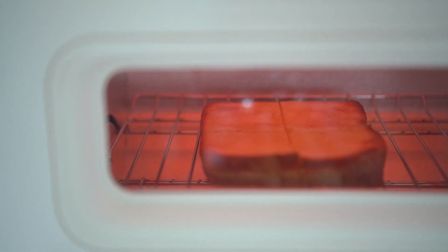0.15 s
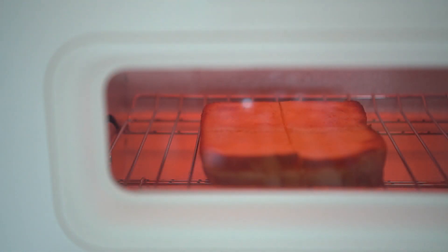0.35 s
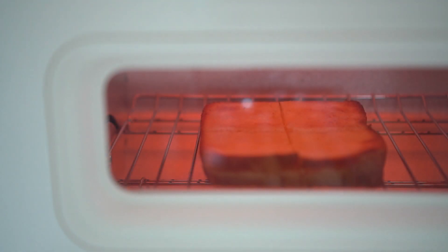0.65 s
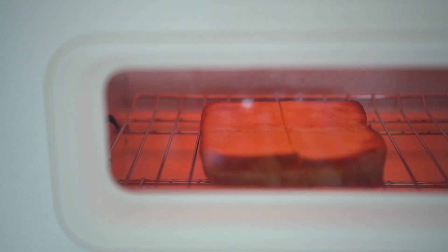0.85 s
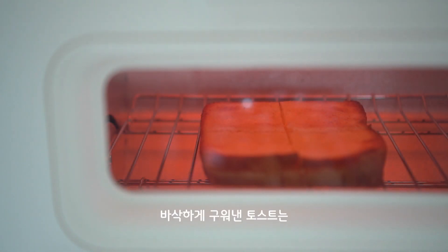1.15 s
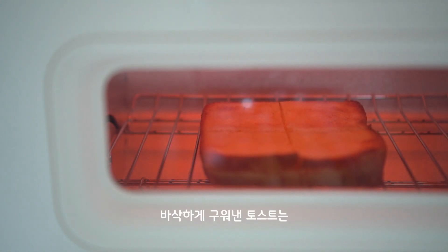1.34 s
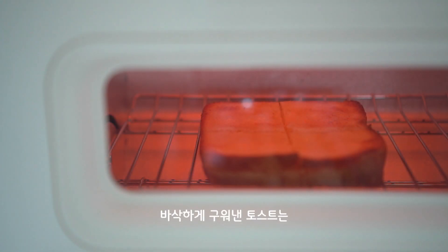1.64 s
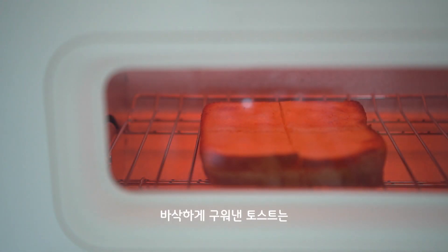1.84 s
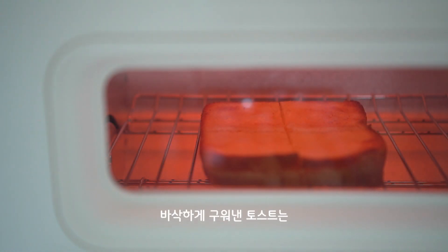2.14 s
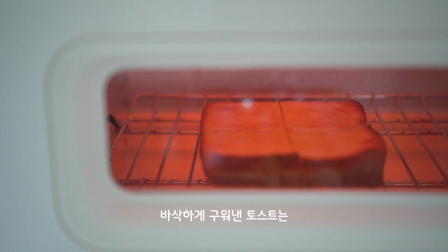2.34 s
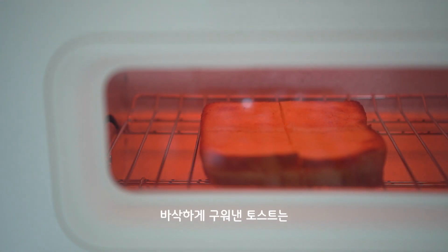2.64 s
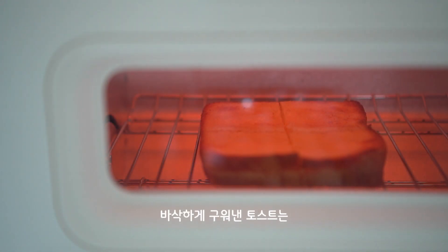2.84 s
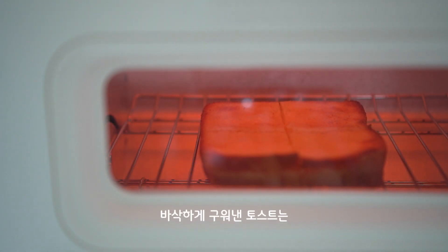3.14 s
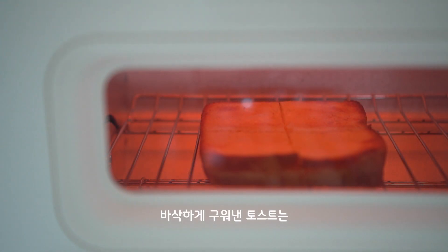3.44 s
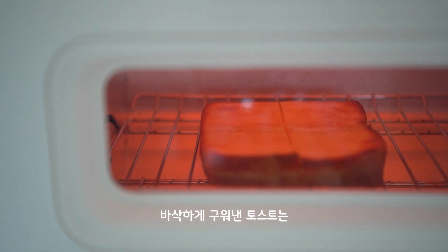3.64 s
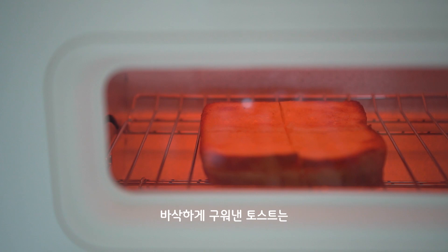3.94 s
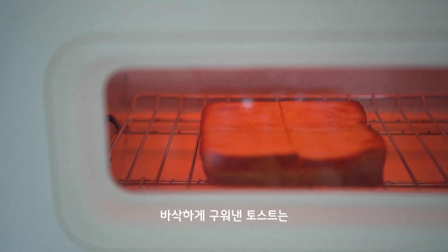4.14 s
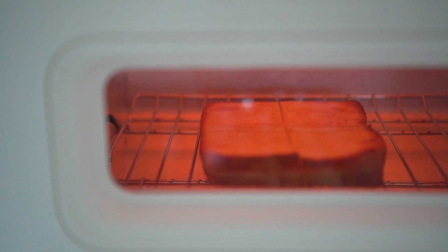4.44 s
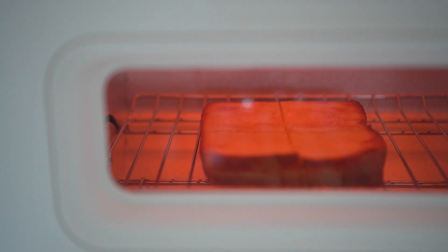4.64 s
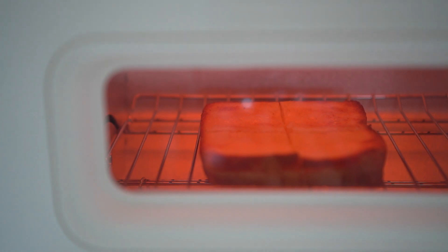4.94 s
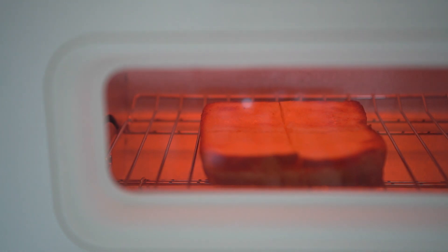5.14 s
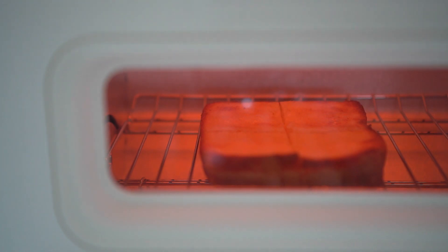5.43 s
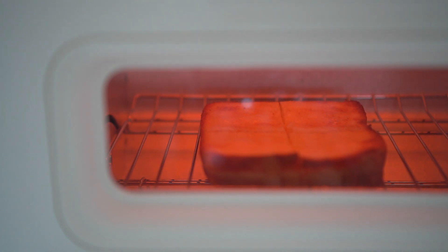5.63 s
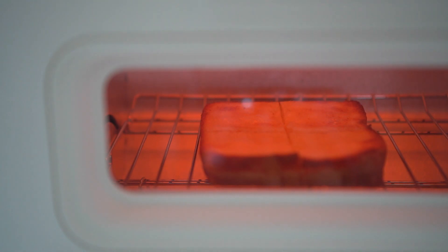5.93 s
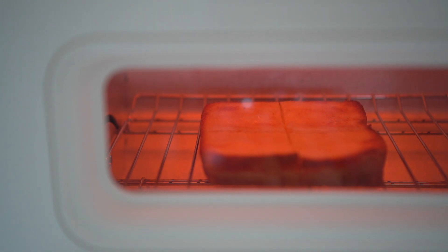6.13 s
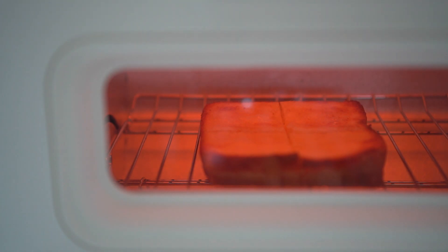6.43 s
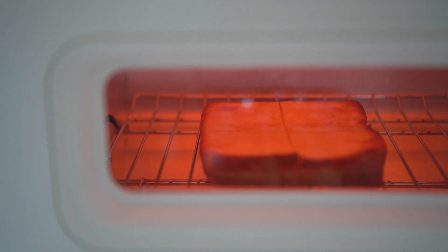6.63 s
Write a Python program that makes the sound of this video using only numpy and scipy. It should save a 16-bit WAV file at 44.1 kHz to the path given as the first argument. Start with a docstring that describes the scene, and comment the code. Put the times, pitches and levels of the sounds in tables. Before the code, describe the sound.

Steady, bright mechanical ticking over faint hum and hiss, a sharp rack click, then a duller sheet-metal clack, amid soft woody knocks.

```python
"""A toaster oven bakes bread in a quiet kitchen, over a faint hum, the air of the room and microphone hiss.
Its clockwork timer soon starts to tick twice a second, a little to the right: small ringing plates.
Near 2 s come three soft knocks, woody tones with a thud. Hot metal then lets go: the rack clicks brightly
at 2.9 s and, after one more knock, the sheet wall clacks more dully at 3.8 s, both as noise and ringing tones.
Two more knocks follow, the last near 6 s, then a faint, soft bump of noise."""
import sys
import numpy as np
from scipy import signal
from scipy.fft import rfft, irfft, next_fast_len
from scipy.io import wavfile
from scipy.ndimage import map_coordinates

SR = 44100
rng = np.random.default_rng(int(sys.argv[2]) if len(sys.argv) > 2 else 0)


def bounce(signal):
    """Save signal as a 16-bit WAV file at the path given by the first command-line argument."""
    frames = np.transpose(np.atleast_2d(signal))
    limited = np.clip(frames, -1, 1)
    pcm = np.round(limited * 32767).astype(np.int16)
    wavfile.write(sys.argv[1], SR, pcm)


N = 298998
RING = np.arange(SR // 2) / SR  # half a second of time after a blow [s]

# Levels in the tables are relative. Decay is the time to fall by 60 dB.
# Left-right is the left level minus the right; side-middle sets how wide the stereo is.

# ringing plates of the timer: (frequency [Hz], level [dB], decay [s], left-right [dB])
TIMER_PLATES = [(3870, 0.5, 0.012, -16.5), (4024, 1, 0.015, 1), (4517, 1.5, 0.012, -15),
                (4894, -1.5, 0.012, -9), (5240, -8, 0.015, 1), (5500, -16.5, 0.017, -14),
                (11100, -34, .025, 2)]
# noise of the timer's parts touching: (frequency [Hz], level [dB])
TIMER_CONTACT = [(2000, -30), (5500, -5), (7200, -10), (8200, 2), (9600, -8), (10900, 1.5), (12000, -12),
                 (16000, -26)]
# the tick as the kitchen returns it: (frequency [Hz], level [dB])
TICK_WASH = [(2500, -34), (3500, -26), (3850, 0), (4050, -1.5), (4250, -7), (4550, -2.5), (4850, -3),
             (5300, -18), (6200, -21.5), (12000, -45)]
# main tones of the wire rack: (frequency [Hz], level [dB], decay [s])
RACK_TONES = [(593, -14.5, 0.15), (830, -23, 0.32), (877, -19.5, 0.33), (1804, -9.5, 0.12),
              (2310, -25, .22), (2430, -20, .14), (2540, -22, 0.15), (2556, 2, 0.1), (2650, -26, 0.26),
              (3300, -19, 0.18), (3770, 1, 0.074), (4700, -16, .04), (6300, -5, 0.079), (9340, -9, 0.072),
              (13370, -12, .035)]
# the rack's crowd of short-lived tones, as noise: (frequency [Hz], level [dB])
RACK_CRASH = [(180, -56), (300, -24), (885, -12), (1170, -22), (1780, -9), (2030, -13), (2570, 2),
              (2930, -16), (3830, -12), (4990, -12), (6200, -10.5), (9710, -18), (11300, -15), (13800, -10),
              (16000, -29)]
# main tones of the sheet wall: (frequency [Hz], level [dB], decay [s])
WALL_TONES = [(148, -22.5, 0.28), (209, -12, 0.35), (606, -15, 0.33), (643, -14, 0.43), (761, 1, 0.31),
              (1044, -12, 0.19), (1225, 1.5, 0.13), (1407, -14, .19), (1796, -10.5, 0.36), (2302, -12, .18),
              (2403, -3, .16), (2590, -15, .16)]
# the wall's crowd of short-lived tones, as noise: (frequency [Hz], level [dB])
WALL_CRASH = [(59, -54), (100, -38), (189, -22), (535, -16), (752, -4), (970, -10.5), (1250, -5),
              (2000, -13), (2370, -7), (2690, -11.5), (4110, -11.5), (5770, -18), (16000, -28)]
# the kitchen hanging on after each loud snap: (frequency [Hz], level [dB])
LINGER = [(100, -14), (200, 4), (380, 6), (750, -2), (1300, 1), (2500, -9), (5000, -24), (12000, -45)]
# how fast echoes die in the kitchen: (frequency [Hz], decay [s])
KITCHEN_DECAY = [(200, 0.86), (1000, 0.44), (4500, 0.24), (9000, 0.19), (15000, .13)]
# soft knocks: (time [s], level [dB], pitch ratio [1], change of the thud's treble [dB])
KNOCKS = [(2.0144, -36.5, 1.06, -14), (2.0859, -36.5, 1.06, -3), (2.1130, -44, 1.094, -12),
          (3.1915, -33.5, 0.97, -12), (4.448, -31.5, 0.995, 4.5), (5.9720, -29, 0.993, 5.5)]
# tones of the counter: (frequency [Hz], level [dB], decay [s])
COUNTER_TONES = [(306, -15, 0.073), (630, -7.5, 0.043), (739, -8, 0.065), (883, -9, 0.028),
                 (1052, -12, 0.062), (1290, -27, 0.074)]
# thud under each knock: (frequency [Hz], level [dB])
THUD = [(120, -35), (280, -2), (700, 8.5), (1100, 2), (1700, -4), (2400, 1), (3000, -14), (5000, -38)]
# faint bump: (frequency [Hz], level [dB])
BUMP = [(30, -22), (70, -4), (110, 6), (170, -14), (350, -3), (700, 8), (1200, -25), (3000, -60)]
# air of the room: (frequency [Hz], level [dB])
AIR = [(25, -52), (50, -60), (70, -44), (90, -25.5), (110, -17.5), (140, -12.5), (175, -13), (215, -7),
       (285, -4), (450, -5.5), (800, -7.5), (1130, -1), (1450, -4.5), (1900, -13.5), (2600, -45),
       (4400, -120)]
# hollow resonances of the air: (frequency [Hz], width [Hz], level [dB])
CAVITIES = [(1124, 41, 5), (1140, 49, -7), (943, 165, -1), (2936, 104, -3)]
# appliance hum, before it wavers: (frequency [Hz], level [dB])
HUM = [(120, -82.5), (279, -72.5), (371, -67.5), (511, -73.5), (657, -69.5), (1125, -66.5)]
# microphone hiss: (frequency [Hz], level [dB])
HISS = [(1180, -27.5), (2000, -4.5), (2640, -2.5), (3010, -2), (3710, -6), (5160, -7.5), (5680, -8),
        (7120, -9.5), (14800, -13.5), (16000, -15)]
# stereo width of the room's sounds: (frequency [Hz], side-middle [dB])
WIDTH = [(60, -30), (130, -14), (280, -9.5), (450, -4.5), (700, 0.5), (1150, -4.5), (1550, 0), (2300, 1.5),
         (2950, -1.5), (3600, -0.5), (8000, -2), (15000, -2)]
# lean of the background to one side: (frequency [Hz], left-right [dB])
LEAN = [(60, -3), (110, 1), (200, 0.5), (380, 1), (700, 0.5), (1290, 3.5), (2380, -1.5), (4400, -2.0),
        (8120, -2.0), (15000, -2.0)]

FIRST_BEAT_S, BEAT_S = 0.4488, 0.5  # time of the first beat, time between beats
TICK_DB, TICK_SCATTER_DB = -28.5, 0.7  # gain of a beat, its random spread
SNAP_DB = -28.5  # gain of each snap of hot metal
LINGER_DB, LINGER_RISE_S, LINGER_T60_S = -24.5, 0.036, 1.2  # gain within the snap, build-up, decay
AIR_DB, HISS_DB = -55.5, -58
TOP_HZ = 15900


def amp(db):
    """Turn decibels into a gain."""
    return 10 ** (np.asarray(db) / 20)


def unit(x):
    """Scale a sound to an average strength (rms) of 1."""
    return x / np.sqrt(np.mean(x ** 2) + 1e-20)


def along(points, hz):
    """Read a curve of (frequency, value) points, spaced as the ear hears pitch."""
    f, v = np.transpose(points)
    return np.interp(np.log(hz + 1), np.log(f + 1), v)


def pan(lean_db):
    """Left and right gains for a level difference; positive leans left."""
    return amp(np.array([[.5], [-.5]]) * lean_db)


def wobble(rate):
    """A smooth random curve through a given number of random points a second."""
    points = rng.standard_normal(int(N * rate / SR) + 4)
    return map_coordinates(points, [np.arange(N) * rate / SR])


def filtered(x, response):
    """Multiply each frequency of a sound by a response."""
    n = x.shape[-1]
    m = next_fast_len(n + SR // 4)
    spectrum = rfft(x, m) * response(np.fft.rfftfreq(m, 1 / SR))
    return irfft(spectrum, m)[..., :n]


def noise(spectrum, width, size):
    """Coloured stereo noise whose middle has rms 1."""
    white = rng.standard_normal((2, size))
    mid, side = filtered(white, lambda hz: amp(along(spectrum, hz)))
    side = filtered(side, lambda hz: amp(along(width, hz)))
    return np.array([mid + side, mid - side]) / np.std(mid)


def fade(attack, t60):
    """Loudness shape of a blow: a short rise, then a steady fall of 60 dB in t60 seconds."""
    rise = 1 - np.exp(-(RING / attack) ** 2)
    return rise * amp(-60 * RING / t60)


def add(track, s, sound):
    """Mix a sound into the track at time s."""
    i = round(s * SR)
    track[:, i:i + sound.shape[-1]] += sound[..., :N - i]


def scatter(decay, delay):
    """A stereo cloud of reflections in which each frequency dies at its own speed."""
    hz, t, z = signal.stft(rng.standard_normal((2, len(RING))), SR, nperseg=256)
    z[1] *= np.minimum(hz / 900, 1)[:, None]  # long waves reach both microphones alike
    dying = z * amp(-60 * t / along(decay, hz)[:, None])
    mid, side = signal.istft(dying, SR, nperseg=256)[1][:, :len(RING)]
    # silent until the delay, full after twice the delay
    return np.array([mid + side, mid - side]) * np.clip(RING / delay - 1, 0, 1)


def echo(sound, cloud, db):
    """The reflections of a sound, at a level in dB against the sound itself."""
    wet = signal.fftconvolve(sound.mean(0)[None], cloud, axes=1)[:, :len(RING)]
    return amp(db) * np.std(sound) * wet / np.std(wet, axis=1, keepdims=True)


def timer(contact_db=-22, casing_db=-8.0, wash_db=-22, wash_t60=0.24, lag=0.000257):
    """Even beats ring the same small plates; the casing answers early, the kitchen in a soft wash."""
    out = np.zeros((2, N))
    casing = scatter([(4000, 0.019)], delay=0.003)
    walls = noise(TICK_WASH, [(4000, 0)], len(RING))  # the same paths at every beat
    for s in np.arange(FIRST_BEAT_S, N / SR, BEAT_S):
        contact = noise(TIMER_CONTACT, [(8000, 1)], len(RING)) * fade(attack=0.0005, t60=0.026)
        tick = amp(contact_db) * contact * pan(-1.5)
        for hz, mode_db, t60, lean_db in TIMER_PLATES:
            # the plates line up 0.8 ms into the blow, then drift apart and beat
            pitch = hz * (1 + rng.normal(0, .002))
            swing = np.cos(2 * np.pi * pitch * (RING - .0008))
            gain = amp(mode_db + rng.normal(0, .8))
            tick += gain * pan(lean_db) * swing * fade(attack=.0012, t60=t60)
        tick[0] = np.interp(RING - lag, RING, tick[0], left=0)  # the left microphone is farther away
        near = echo(tick, casing, casing_db) * pan(-3)
        # nearby walls answer first, the whole room lingers
        lingering = fade(.006, wash_t60) + amp(-12.5) * fade(0.01, 0.81)
        fresh = noise(TICK_WASH, [(4000, 0)], len(RING))
        wash = amp(wash_db) * (.8 * walls + .6 * fresh) * lingering * pan(-2)
        force = amp(TICK_DB + TICK_SCATTER_DB * rng.standard_normal())
        add(out, s, force * (tick + near + wash))
    return out


def hot_metal():
    """The hot rack clicks in its rails; a second later the sheet wall pops."""
    out = np.zeros((2, N))
    rack = snap(RACK_TONES, RACK_CRASH, ring_db=0.5, attack=0.0015, crash_t60=0.067,
                travel=0.013, side_db=-9.5, lean_db=-4.0, room_db=-6.0)
    add(out, 2.8762, amp(SNAP_DB) * rack)
    wall = snap(WALL_TONES, WALL_CRASH, ring_db=-6, attack=0.0034, crash_t60=0.096,
                travel=0.00212, side_db=-6.5, lean_db=-2.5, room_db=-3.0)
    add(out, 3.8482, amp(SNAP_DB) * wall)
    return out


def snap(modes, spectrum, ring_db, attack, crash_t60, travel, side_db, lean_db, room_db):
    """Hot metal slips for a few milliseconds: a crash of many tones, while the main ones ring on."""
    width = [(150, side_db - 15), (1000, side_db), (6000, side_db + 6)]
    crash = noise(spectrum, width, len(RING)) * fade(attack, crash_t60)
    ring = 0
    for hz, db, t60 in modes:
        # a small random phase difference between left and right
        phase = rng.uniform(0, 2 * np.pi) + np.array([[.5], [-.5]]) * rng.normal(0, 0.15)
        ring = ring + amp(db) * np.sin(2 * np.pi * hz * RING + phase) * fade(0.0047, t60)
    room = echo(crash, scatter(KITCHEN_DECAY, delay=0.0091), room_db)
    late = amp(LINGER_DB) * noise(LINGER, WIDTH, len(RING)) * fade(LINGER_RISE_S, LINGER_T60_S)
    return dispersed(crash + amp(ring_db) * ring + room, travel) * pan(lean_db) + late


def dispersed(x, travel):
    """Bending waves in thin metal go faster at high pitch, so low ones arrive late; travel scales this."""
    def response(hz):
        late = travel * np.maximum(np.sqrt(1000 / (hz + 100)) - .45, 0)  # delay [s]
        turns = np.cumsum(late) * hz[1]  # adding delay up over frequency gives the phase
        return np.exp(-2j * np.pi * turns)
    return filtered(x, response)


def knocks(room_db=-1, thud_db=-18):
    """Dull blows on the counter, about half from the room; each has its own amount of thud treble."""
    out = np.zeros((2, N))
    for s, db, pitch, treble_db in KNOCKS:
        wood = 0
        for hz, level, t60 in COUNTER_TONES:
            swing = np.cos(2 * np.pi * hz * pitch * (RING - .003) + rng.normal(0, .4))
            wood = wood + amp(level) * swing * fade(.0025, t60)
        thud = noise(THUD, [(200, -22), (1000, -18)], len(RING)) * fade(0.0017, 0.14)
        thud = filtered(thud, lambda hz: amp(along([(1100, 0), (2000, treble_db)], hz)))
        direct = amp(db) * pan(-2.5) * (wood / np.abs(wood).max() + amp(thud_db) * thud)
        add(out, s, direct + echo(direct, scatter(KITCHEN_DECAY, delay=0.0029), room_db))
    return out


def bump(db=-56):
    """Something heavy settles softly, farther off: a short swell of noise."""
    out = np.zeros((2, N))
    add(out, 6.315, amp(db) * noise(BUMP, WIDTH, len(RING)) * fade(attack=0.013, t60=0.67))
    return out


def background(cavity_db=-63.0):
    """Steady room air with a few hollow resonances, a wavering appliance hum and smooth hiss."""
    def cavities(f):
        return sum(amp(g) / (1 + (2 * (f - c) / w) ** 2) for c, w, g in CAVITIES)

    air = amp(AIR_DB) * noise(AIR, WIDTH, N)
    hollow = amp(cavity_db) * unit(filtered(rng.standard_normal(N), cavities))
    hum = 0
    for hz, level in HUM:
        # both the level and the phase waver
        gain = amp(level + 2.6 * wobble(1.97))
        hum = hum + gain * np.sin(2 * np.pi * hz * np.arange(N) / SR + hz / 700 * wobble(7))
    hiss = amp(HISS_DB) * noise(HISS, WIDTH, N)
    return filtered(air + hollow + hum + hiss, lambda hz: pan(along(LEAN, hz)))


def mains(beat_hz=0.316, still_at=1.95):
    """A motor turning just under the mains frequency beats slowly against the mains hum."""
    t = np.arange(N) / SR - still_at  # the two nearly cancel at still_at [s]
    hum = np.sin(2 * np.pi * 60 * t)
    motor = .8 * np.sin(2 * np.pi * (60 - beat_hz) * t)
    return amp(-87) * (hum - motor)


def scene():
    """Timer, hot metal, knocks and bump over the kitchen's background."""
    return timer() + hot_metal() + knocks() + bump() + background() + mains()


def record(dry):
    """The recorder keeps nothing above its band limit."""
    return filtered(dry, lambda hz: hz < TOP_HZ)


dry = scene()
out = record(dry)
bounce(out)
```